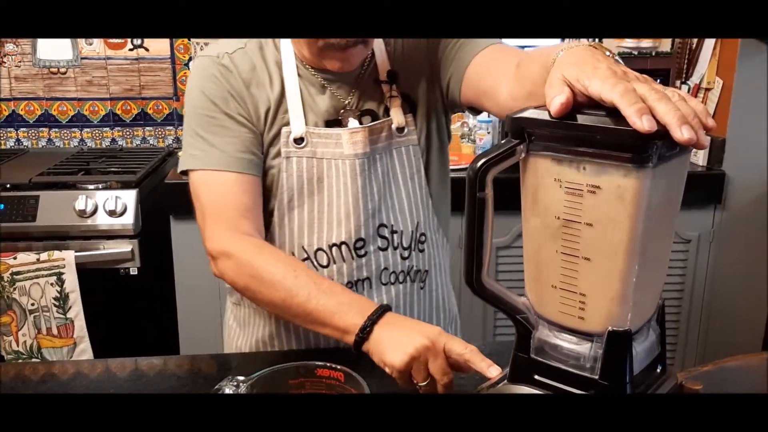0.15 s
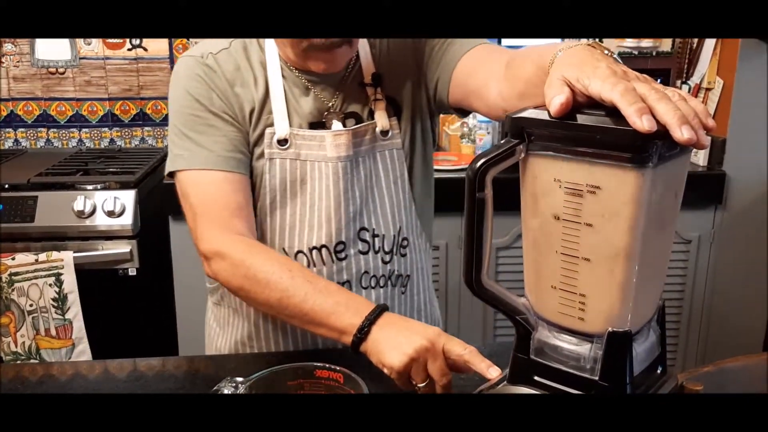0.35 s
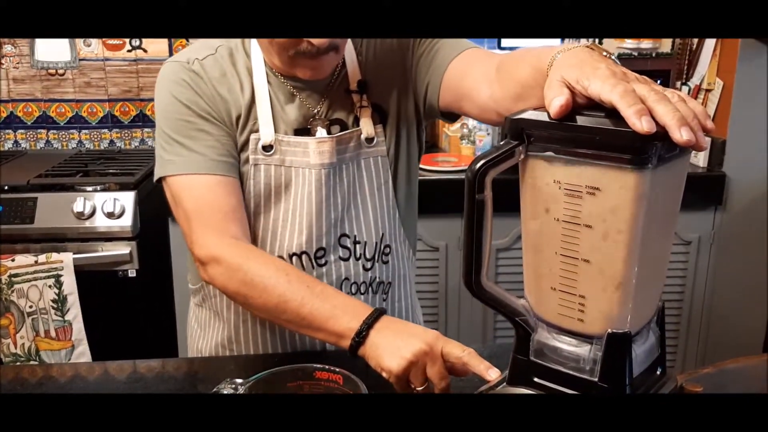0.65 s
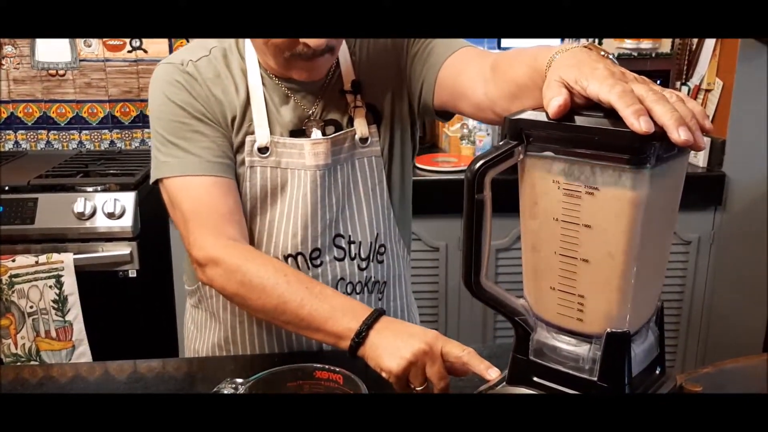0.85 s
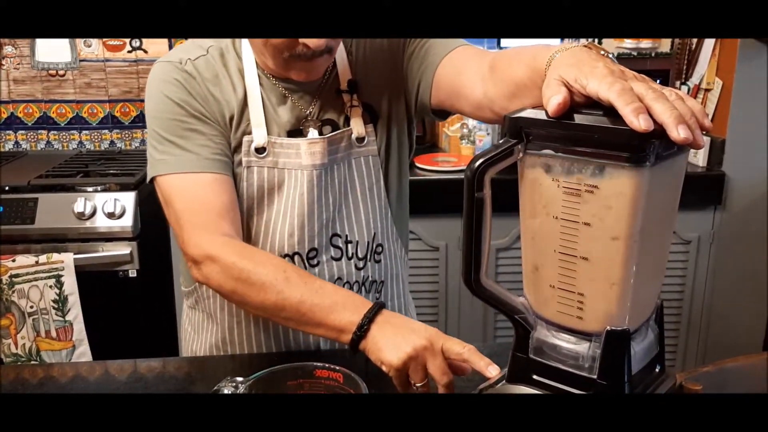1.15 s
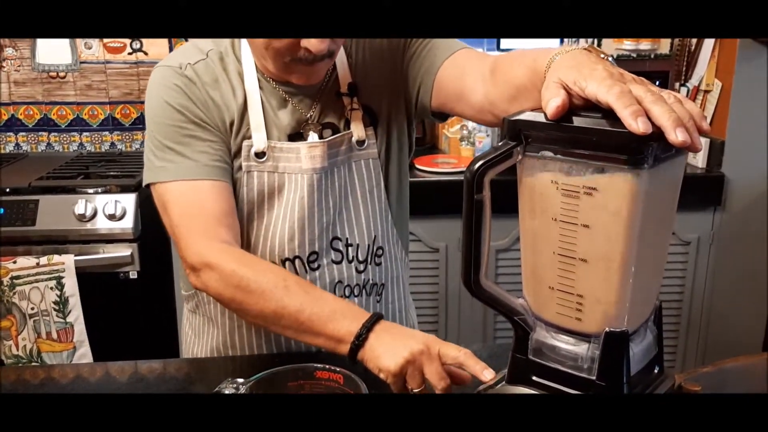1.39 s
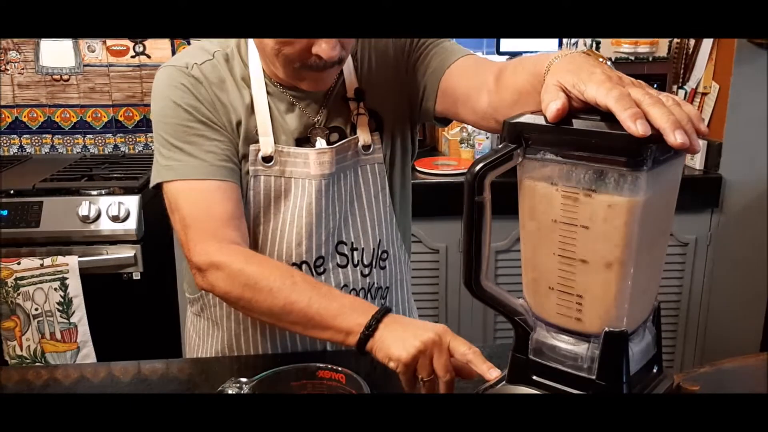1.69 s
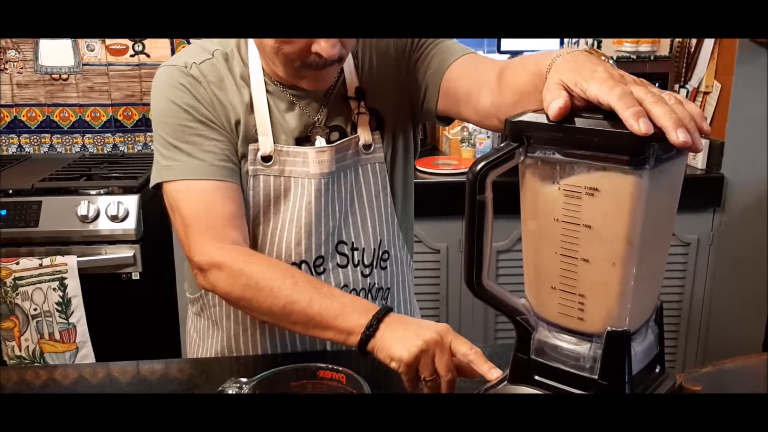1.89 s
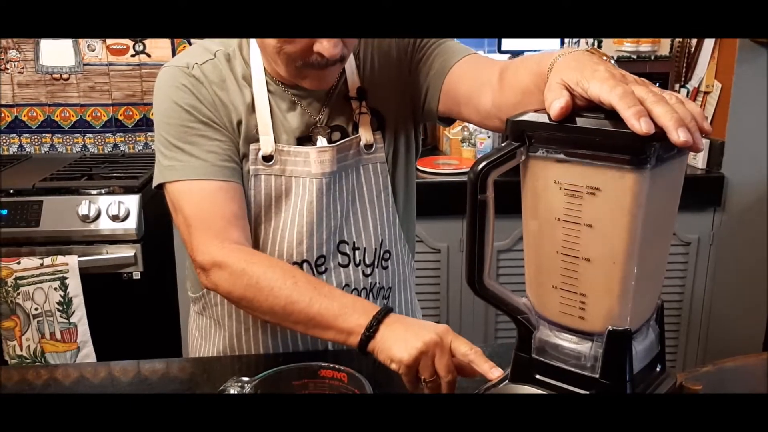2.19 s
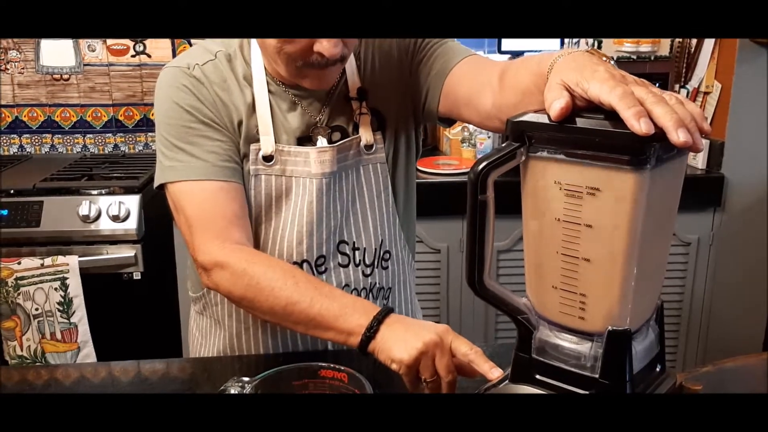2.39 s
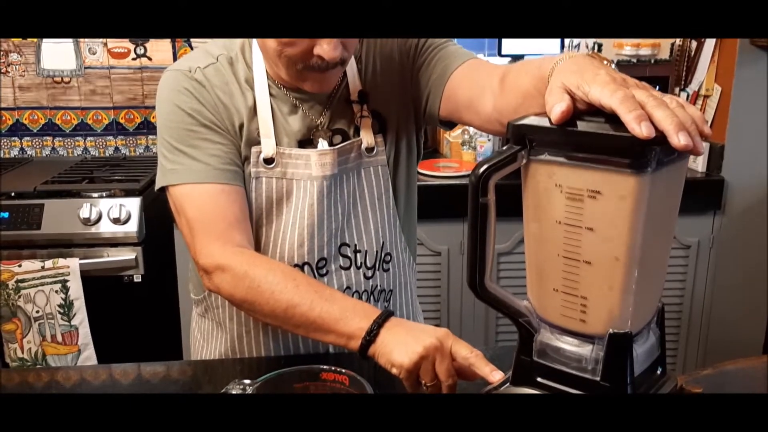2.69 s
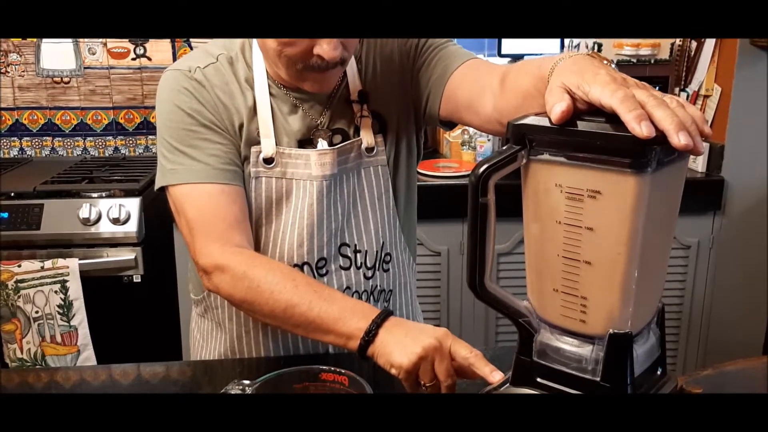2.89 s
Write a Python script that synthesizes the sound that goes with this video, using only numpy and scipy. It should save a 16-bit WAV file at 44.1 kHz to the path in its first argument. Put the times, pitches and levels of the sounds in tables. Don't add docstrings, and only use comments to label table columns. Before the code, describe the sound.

A countertop blender churns thick liquid at full speed, close to the microphone in a kitchen. At about 0.2 s it is switched off: the whine slides down, the roar and hiss fade, air pockets gulp and lumps knock the jar until 1.2 s. Only faint air murmur and small ticks remain around 1.4-1.65 s. At 1.7 s a sharp click restarts it; pitch climbs rapidly, then whine, hollow roar and splashy hiss hold to 3 s, with scattered knocks and a brief treble dropout near 1.8 s.

```python
import sys
import numpy as np
from scipy import signal
from scipy.fft import rfft, irfft
from scipy.io import wavfile
from scipy.ndimage import uniform_filter1d

SR = 44100
rng = np.random.default_rng(int(sys.argv[2]) if len(sys.argv) > 2 else 0)


def to_wav(sig):
    pcm = np.clip(np.atleast_2d(sig), -1, 1) * 32767
    pcm = np.round(pcm).astype(np.int16)
    wavfile.write(sys.argv[1], SR, pcm.T)


def amplitude_ratio(level_db):
    exponent = np.asarray(level_db, float) / 20
    return 10 ** exponent


N = 134505

OFF_S, ON_S = .22, 1.698


def rms_one(x):
    return x / np.sqrt(np.mean(x ** 2) + 1e-20)


def in_time(rows):
    return np.interp(np.arange(N) / SR, *np.transpose(rows))


def at_hz(points, hz):
    point_hz, point_db = np.transpose(points)
    return np.interp(np.log(hz), np.log(point_hz), point_db)


def drift(rate):
    every = 40
    r = np.exp(-2 * every * np.pi * rate / SR)
    white = rng.standard_normal(N // every + 2002)
    slow = signal.lfilter([1], [1, -2 * r, r * r], white)[2000:]
    return np.interp(np.arange(N) / every, np.arange(len(slow)), rms_one(slow))


def lowpass(x, order, hz):
    return signal.sosfilt(signal.butter(order, hz, fs=SR, output="sos"), x)


def highpass(x, order, hz):
    return signal.sosfilt(signal.butter(order, hz, "high", fs=SR, output="sos"), x)


def bandpass(x, order, low, high):
    return signal.sosfilt(signal.butter(order, [low, high], "band", fs=SR, output="sos"), x)


def resonance(x, hz, width):
    r = np.exp(-np.pi * width / SR)
    poles = [1, -2 * r * np.cos(2 * np.pi * hz / SR), r * r]
    return signal.lfilter([(1 - r * r) / 2, 0, (r * r - 1) / 2], poles, x)


def banded_noise(spectrum, patchy_db, shared_db=0):
    out, white = 0, rng.standard_normal((2, N))
    edges = np.geomspace(25, 17000, 34)
    for k, (low, high) in enumerate(zip(edges, edges[1:])):
        middle = np.sqrt(low * high)
        if spectrum[0][0] * .8 < middle < spectrum[-1][0] * 1.1:
            band = bandpass(white[k % 2], 3, low, high)
            out = out + amplitude_ratio(at_hz(spectrum, middle) + patchy_db * drift(16.4)) * band
    return rms_one(out * amplitude_ratio(shared_db))


# pitch in Hz, level in dB.
MURMUR = [(28, 7), (60, 1), (110, 12.5), (300, 8), (700, 8), (2400, -16), (6000, -21), (15500, -26)]


def murmur():
    return amplitude_ratio(-47) * banded_noise(MURMUR, patchy_db=2.5)


# start in seconds, crack peak in dB, thud in dB, crack centre in Hz.
KNOCKS = [(.835, -28, -30, 11000), (.85, -30, -33, 11000), (1.635, -31, -37, 14000),
          (1.116, -26, -40, 13500), (0.469, -33, -26, 10000), (0.664, -29, -30, 11000),
          (.7, -32, -35, 14000), (.728, -30, -41, 10000), (.74, -30, -30, 13000), (1.28, -46, -47, 11000),
          (1.38, -40, -48, 5000), (1.563, -52, -36, 6500), (1.671, -40, -27.5, 4000),
          (1.876, -20, -14, 12000), (2.023, -13.5, -20, 8900), (2.208, -18, -16, 8200),
          (2.248, -22, -20, 13000), (2.27, -28, -20, 10000), (2.34, -24, -26, 8000),
          (2.454, -18, -20, 8500), (2.607, -25, -24, 9000), (2.999, -29, -27, 11000),
          (.506, -28, -21, 8500), (0.576, -17, -8, 14000), (0.765, -7, -10, 4900), (.82, -22, -18, 9000),
          (.878, -13, -11.5, 8700), (.889, -24, -9, 5100), (.921, -24, -14, 11000),
          (0.998, -15.5, -15, 3980), (1.065, -26, -18, 9500), (1.114, -15.5, -38, 5900),
          (1.139, -23, -15.5, 5100), (1.199, -41, -30, 13000), (1.308, -43, -49, 9500),
          (1.345, -40, -47, 7000), (1.434, -49, -40, 8000), (1.487, -55, -50, 6000),
          (1.541, -37, -34, 6000), (1.635, -25, -27.5, 6300), (1.677, -28, -45, 7550),
          (1.696, -11, -3, 4550), (1.742, -17, -23, 7000), (1.761, -11.5, -7, 8100), (2.147, -9, -11, 8100),
          (2.304, -20, -3.5, 11000), (2.476, -15, -8.5, 12000), (2.517, -23, -9, 13400),
          (2.745, -18.5, -26, 11500)]


def knocks():
    crack_t60_s, thud_t60_s, rise_s = .025, .021, .00072
    crack_trim_db, thud_trim_db = -11.5, -4
    out, t = np.zeros(N + SR), np.arange(4000) / SR
    rise = 1 - np.exp(-t / rise_s)
    draws = rng.standard_normal((len(KNOCKS), 2, len(t)))
    for (s, db, thud_db, hz), (bright, dull) in zip(KNOCKS, draws):
        bright = highpass(bright, 2, .55 * hz)
        coloured = resonance(resonance(bright, hz, .54 * hz), hz, .54 * hz)
        crack = rms_one(bright) * .46 + rms_one(coloured)
        thud = rms_one(bandpass(dull, 2, 200, 1900))
        crack = amplitude_ratio(db + crack_trim_db - 60 * t / crack_t60_s) * crack
        thud = amplitude_ratio(thud_db + thud_trim_db - 60 * t / thud_t60_s) * thud
        i = int(s * SR)
        out[i:i + len(t)] += rise * (crack + thud)
    return out[:N]


# start in seconds, pitch in Hz, peak in dB, time to fade by 60 dB in
# seconds.
GULPS = [(.41, 604, -7.5, .02), (.424, 500, -5, 0.024), (.495, 662, -13.5, 0.11), (.48, 1850, -20.5, 0.21),
         (.507, 690, -7.5, 0.022), (.535, 290, -14.5, 0.12), (.77, 1310, -8.5, 0.017), (.79, 299, -17, .08),
         (.879, 590, -14, 0.029), (.8885, 790, -4, 0.018), (.888, 1770, -16, .03), (0.886, 316, -12, 0.04),
         (.925, 613, -16, 0.032), (1.002, 296, -38, 0.072), (1.075, 513, -15, 0.048),
         (1.194, 286, -22, 0.17), (1.23, 536, -26, 0.1), (1.433, 1010, -33.5, 0.027),
         (1.486, 740, -39, .03), (1.541, 990, -31.5, 0.043), (1.575, 290, -54, 0.086),
         (1.634, 1110, -26, 0.037), (1.696, 1515, -12, 0.065), (1.786, 276, -8, 0.07),
         (1.79, 1690, -14, .1), (1.82, 1940, -19, 0.086)]


def gulps():
    t, out = np.arange(N) / SR, np.zeros(N)
    for s, hz, db, t60 in GULPS:
        age = np.maximum(t - s, 0)
        swell = 1 - np.exp(-age / (.03 * t60))
        out += amplitude_ratio(db - 60 * age / t60) * swell * np.sin(2 * np.pi * hz * age)
    return out


# time in seconds, motor contact bars passing per second (Hz).
SPEED = [(0, 5210), (.2, 5235), (.31, 4555), (.39, 4040), (.5, 3390), (.7, 2390), (.92, 1470), (1.2, 680),
         (1.42, 60), (1.69, 60), (1.8, 2300), (1.9, 3370), (2.02, 4290), (2.16, 4655), (2.31, 4960),
         (2.6, 5255), (2.8, 5340), (3.05, 5395)]


def motor_speed():
    bars_hz = in_time(SPEED)
    return bars_hz, bars_hz / SPEED[-1][1]


# pitch in Hz, level in dB.
ROAR = [(28, -69), (70, -19), (150, -35), (220, -8), (650, -3.5), (900, -6.5), (1500, -9), (2500, -23)]
# pitch in Hz, width in Hz, level in dB.
JAR = [(395, 35, -8), (505, 35, -5), (659, 35, -3), (780, 40, -6), (966, 35, -8), (1085, 60, -4),
       (1290, 60, -5), (1435, 60, -6), (1760, 90, -10), (2290, 120, -13), (2660, 60, -13), (2930, 60, -18),
       (3240, 70, -18)]


def roar(churn_db, share, since_on_s):
    surge = rng.standard_normal(N) * amplitude_ratio(2.0 * drift(20))
    rung = 0
    for hz, width, db in JAR:
        rung = rung + amplitude_ratio(db - 10 + 2.0 * drift(25)) * rms_one(resonance(surge, hz, width))
    rung = lowpass(rung, 2, 4500)
    kick_db = 5.5 * (since_on_s > 0) * np.exp(-np.abs(since_on_s) / .68)
    boom = amplitude_ratio(-6 - .5 * share ** 8 + kick_db) * rms_one(resonance(surge, 290.6, 41))
    tumble = banded_noise(ROAR, patchy_db=3.0, shared_db=.82 * drift(21.5))
    out = amplitude_ratio(churn_db - 2.5) * (tumble + rung + boom)
    slack = np.clip(.6 * 2 * (1 - share), 0, 1) * (since_on_s < 0)
    return out - slack * resonance(out, 176, 83)


# pitch in Hz, level in dB.
HISS = [(2000, -10), (2600, 2.5), (3600, 2), (6000, 2.5), (7000, -1), (9200, -7.5), (11000, -19),
        (15800, -10.5)]
# pitch in Hz, width in Hz, level in dB.
SHELL = [(6040, 630, -17), (8040, 320, -14), (8490, 540, -8)]


def hiss(churn_db, share, since_on_s):
    air = rng.standard_normal((2, N))
    shell = 0
    for hz, width, db in SHELL:
        shell = shell + amplitude_ratio(db + 2.6 * drift(38)) * rms_one(resonance(air[0], hz, width))
    spray = amplitude_ratio(-26 - 3 * drift(45)) * highpass(air[1], 4, 11800)
    out = banded_noise(HISS, patchy_db=1.1, shared_db=1.6 * drift(32)) + shell + spray
    out = out - .35 * resonance(out, 11000, 1300)
    top_db = churn_db.max()
    swing_db = 1.25 * (churn_db - top_db)
    spin_up_db = -2 * (.5 - share) * (since_on_s > 0)
    return amplitude_ratio(top_db + swing_db - 14.5 + spin_up_db) * out


# time in seconds, level in dB.
CHURN = [(0, -14), (.2, -15.5), (.45, -17.5), (.68, -22), (.8, -20.5), (.97, -26), (1.15, -29), (1.22, -34),
         (1.3, -40.5), (1.42, -53), (1.52, -61), (1.58, -44.5), (1.692, -43.5), (1.7, -20.5), (1.8, -16),
         (2.1, -15), (2.5, -15.5), (3.05, -16.5)]


def liquid():
    churn_db, share = in_time(CHURN), motor_speed()[1]
    since_on_s = np.arange(N) / SR - ON_S
    return roar(churn_db, share, since_on_s) + hiss(churn_db, share, since_on_s)


# pitch in Hz, width in Hz, level in dB.
HOUSING = [(2780, 300, -1), (3300, 250, -8), (4230, 350, -2), (4680, 330, 1), (5240, 130, 0),
           (5370, 160, -5), (7600, 800, -4), (8750, 700, 3), (9600, 700, -1), (10700, 400, -9),
           (13500, 900, -3), (14500, 900, -5)]


def housing(hz):
    power = 0
    for centre, width, db in HOUSING:
        power = power + amplitude_ratio(2 * db) / (1 + (2 * (hz - centre) / width) ** 2) ** 2
    return np.sqrt(power)


# multiple of the rotation, level at full speed in dB.
LOW_TONES = [(1, -26), (2, -35), (3, -23.5), (6, -38), (12, -43)]
# multiple of the rotation, level at full speed in dB.
WHINE_TONES = [(24, -35), (48, -45), (72, -43), (96, -52)]


def motor():
    bars, gear = 24, 4.1
    t = np.arange(N) / SR
    bars_hz, share = motor_speed()
    turn_hz = bars_hz / bars * (1 + .001 * drift(12))
    phase = 2 * np.pi * np.cumsum(turn_hz) / SR
    on = uniform_filter1d(((t < OFF_S) | (t > ON_S)) * 1., size=3000)

    low = amplitude_ratio(-43 + 1.5 * drift(4.8)) * np.sin(phase / gear)
    for k, db in LOW_TONES:
        coast_db = -9 * (1 - on) * (k > 1)
        low = low + amplitude_ratio(db + coast_db + 1.5 * drift(1.7)) * np.sin(k * phase)
    out = low * share ** 4.5

    for k, db in WHINE_TONES:
        hz = k * turn_hz
        gain = housing(hz) * amplitude_ratio(db + 3.2 * drift(12)) * share ** .35
        gain = gain * np.clip((16500 - hz) / 3000, 0, 1)
        gain = gain * np.clip(4 * share, 0, 1)
        out = out + gain * np.sin(k * phase)

    mains_hz, inrush_s = 120, .22
    inrush_db = 11 * (t > OFF_S) * np.exp(-((t - ON_S - inrush_s) * 2 / inrush_s) ** 2)
    buzz = amplitude_ratio(-49 + inrush_db + 2 * drift(8)) * on ** 2 * np.sin(2 * np.pi * mains_hz * t)
    return np.sqrt(2) * (out + buzz)


def scene():
    return (motor() + liquid() + knocks() + gulps() + murmur())[None]


# middle in seconds, length in seconds, depth in dB, lowest pitch lost in Hz.
DROPOUTS = [
    (.115, .013, -17, 2000),
    (.37, .015, -15, 1500),
    (.413, .013, -14, 2000),
    (.498, .015, -14, 2000),
    (1.822, .048, -55, 2150),
    (2.014, .012, -14, 1700),
    (2.847, .018, -14, 1700),
]
SPARED_HZ = [
    [2347, 2670, 3219, 4371, 5232],
    [1733, 2336, 4155, 4425, 8397],
    [4392, 4672, 8494],
    [8550],
    [3250, 8280, 8620],
    [2400],
    [2336, 2680],
]


def dropouts(dry):
    t, hz = np.arange(N) / SR, np.arange(N // 2 + 1) * SR / N
    out, edge_s = dry.copy(), .006
    for (s, length, db, above_hz), lines_hz in zip(DROPOUTS, SPARED_HZ):
        spared = amplitude_ratio(6) * sum(np.exp(-((hz - f) / 60) ** 2) for f in lines_hz)
        lost = np.clip((hz - above_hz) / 100, 0, 1) + (hz < 140)
        lost_sound = irfft(rfft(dry) * lost * (1 - spared), N)
        during = np.clip((length / 2 - np.abs(t - s)) / edge_s + .5, 0, 1)
        out -= (1 - amplitude_ratio(db)) * during * lost_sound
    return out


def roll_off(x):
    return signal.sosfilt(signal.butter(12, 15840, fs=SR, output="sos"), x)


def record(dry):
    mix = highpass(dropouts(dry), 2, 38)
    return roll_off(mix)


dry = scene()
out = record(dry)
to_wav(out)
```